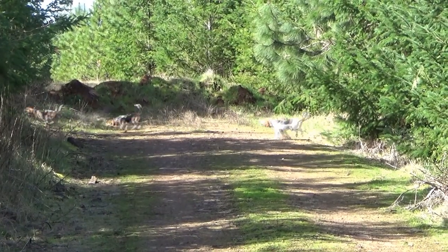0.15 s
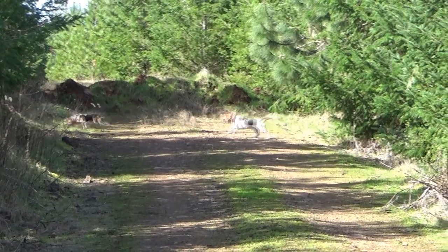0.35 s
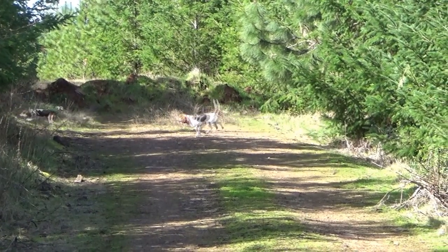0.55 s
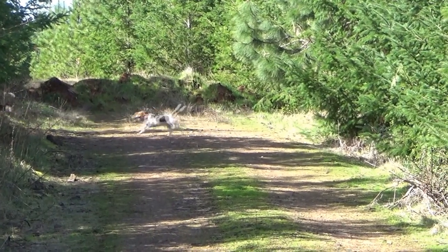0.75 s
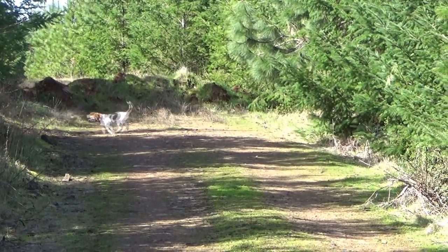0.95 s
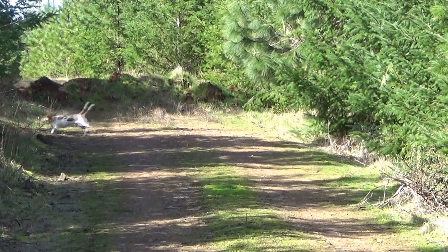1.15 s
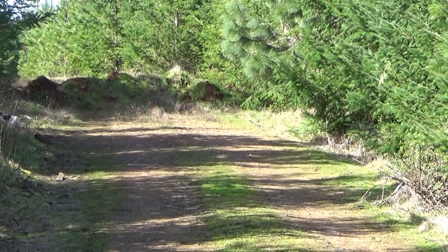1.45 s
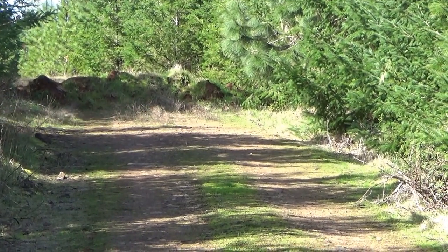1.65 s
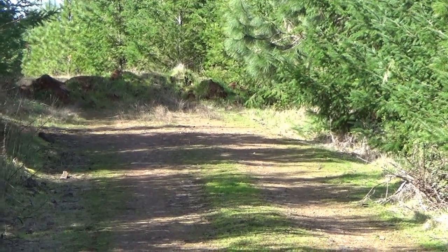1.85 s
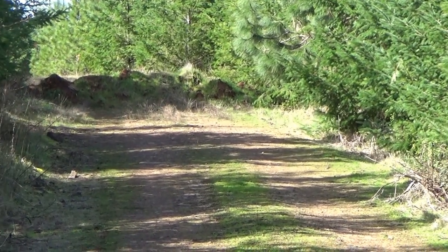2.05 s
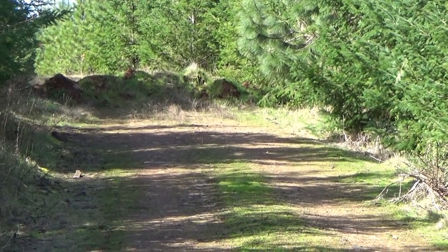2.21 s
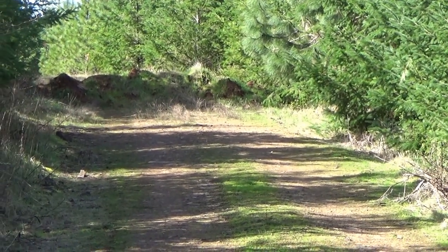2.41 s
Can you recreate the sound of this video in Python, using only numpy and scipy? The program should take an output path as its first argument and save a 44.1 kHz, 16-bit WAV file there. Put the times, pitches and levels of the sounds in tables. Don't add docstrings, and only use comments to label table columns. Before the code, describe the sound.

A pack of hounds baying and yelping on a forest trail, one loud cracked bay up close

```python
import sys
import numpy as np
from scipy import signal
from scipy.fft import rfft, irfft, next_fast_len
from scipy.io import wavfile
from scipy.ndimage import uniform_filter1d, map_coordinates

SR = 44100
rng = np.random.default_rng(int(sys.argv[2]) if len(sys.argv) > 2 else 0)


def gain_from_db(level_db):
    decades = np.asarray(level_db, float) / 20
    return 10 ** decades


def unload_audio(sound):
    columns = np.transpose(np.atleast_2d(sound))
    steps = np.round(np.clip(columns, -1, 1) * 32767)
    wavfile.write(sys.argv[1], SR, steps.astype(np.int16))


N = 114660

# f/Hz, level/dB
BARK_THROAT = [(380, -23.5), (600, 12.5), (1200, 2), (1700, -5), (2600, -9.5), (3400, -26.5), (6000, -26.5),
               (11000, -26)]
ATTACK_S, RELEASE_S = .005, .014


def near_hound():
    # t/s, pitch f/Hz, level/dB, mouth opening/dB, half-pitch share/0-1
    bay = [
        (.222, 531.2, -50, 26, 0.36),
        (0.241, 598.7, -30.5, 13.5, 0.99),
        (0.277, 542.5, -22.5, 13.5, 0.58),
        (0.302, 608.3, -12.5, -2, 0.04),
        (0.347, 636.2, -11, -17, 0.96),
        (0.364, 579.1, -15.5, -10.5, 0.65),
        (0.399, 591, -13, -16.5, 0.66),
        (.416, 499.3, -30.5, 1, 0.83),
        (0.451, 483, -46.5, 7, 0.8),
    ]
    # f/Hz, level/dB
    throat = [(300, -45), (600, 0.5), (850, -0.5), (1100, -6), (1400, -14), (2200, -24), (3200, -50),
              (4300, -75)]
    # f/Hz, level/dB per Hz
    breath_spectrum = [(3500, -25), (5000, -20), (5700, -7), (7000, 1), (8000, -8), (9300, -4),
                       (11500, -14), (12500, -40)]
    # f/Hz, level/dB per Hz
    chest_spectrum = [(40, -15.5), (110, -5), (250, -1), (420, -1), (520, -45.5)]
    # from t/s, to t/s, first f/Hz, last f/Hz, first level/dB, last level/dB
    groan_glide = (.4, .5, 520, 150, -42, -60)

    s, *columns = np.transpose(bay)
    span = np.arange(round(s[0] * SR), round(s[-1] * SR))
    curves = [uniform_filter1d(np.interp(span / SR, s, c), size=260) for c in columns]
    pitch, level_db, opening_db, half = curves
    tone, phase = folds(pitch, throat, .003 + .03 * half, .5 + 3 * half, opening_db, half)

    air = rng.standard_normal((2, len(span))) * (1 + 0.46 * np.cos(phase))
    rasp = unit(coloured(air[0], [(350, -70), (650, -18)] + throat[2:]))
    rasp = rasp * gain_from_db(-5 + opening_db) * np.sqrt(np.abs(half))
    breath = unit(coloured(patchy(air[1:], depth_db=5.5)[0], breath_spectrum))
    breath = breath * gain_from_db(-39 + 0.61 * opening_db + 0.81 * level_db)
    chest = gain_from_db(-38) * unit(coloured(rng.standard_normal(len(span)), chest_spectrum))

    t = np.arange(N) / SR
    groan_hz = np.exp(np.interp(t, groan_glide[:2], np.log(groan_glide[2:4])))
    groan = np.sin(2 * np.pi * np.cumsum(groan_hz) / SR)
    out = groan * gain_from_db(np.interp(t, groan_glide[:2], groan_glide[4:], left=-120, right=-120))
    onset = np.clip((span - span[0]) / (ATTACK_S * SR), 0, 1) ** 2
    out[span] += onset * (gain_from_db(level_db) * (1.49 * tone + rasp + chest) + breath)
    return out


def folds(pitch, throat, jitter, shimmer_db, opening_db=0, half=0):
    size = len(pitch)
    pitch = pitch * (1 + jitter * wobble(size, 69.82))
    half_phase = np.pi * np.cumsum(pitch) / SR
    tone = 0
    for k in range(1, 21):
        level_db = along(throat, k * pitch / 2) + opening_db * (k > 2)
        level_db = level_db + shimmer_db * np.sqrt(k / 2) * wobble(size, 61.7)
        share = half if k % 2 else 1
        tone = tone + gain_from_db(level_db) * share * np.sin(k * half_phase + k * k)
    return tone, 2 * half_phase


def far_hound(calls, throat, jitter, shimmer_db, hoarse, half, swell=0):
    out = np.zeros(N + SR)
    share = np.clip(hoarse, 0, 1)
    for s, length, level_db, first_hz, last_hz in calls:
        t = np.arange(round((1.6 * length + .1) * SR)) / SR
        rise = np.clip(t / (ATTACK_S + swell * length), 0, 1)
        after = np.clip(t - (1 - swell) * length, 0, 1)
        shape = rise * np.exp(-after / (RELEASE_S + swell * length / 2))
        pitch = first_hz + (last_hz - first_hz) * np.minimum(t, length + RELEASE_S) / length
        tone, phase = folds(pitch, throat, jitter, shimmer_db, 0, half)
        rasp = coloured(rng.standard_normal(len(t)) * (1 + 0.72 * np.cos(phase)), throat)
        rasp = rasp * gain_from_db(2.0 * wobble(len(t), 30))
        voice = np.sqrt(1 - share) * unit(tone) + np.sqrt(share) * unit(rasp)
        out[round(max(s, 0) * SR):][:len(t)] += gain_from_db(level_db) * shape * voice
    return out[:N]


def bays():
    calls = [(0, 0.014, -26.5, 633, 581.5), (.05, 0.026, -31.5, 695, 687), (.11, 0.12, -46, 640, 608),
             (.41, 0.023, -30.5, 671, 638.4), (.475, .03, -51, 614, 630), (.53, 0.062, -38.5, 674.6, 616),
             (.64, 0.018, -35, 617, 667), (.741, 0.013, -29.5, 670, 715.5),
             (1.069, 0.15, -32.5, 644.5, 531.4), (1.25, 0.024, -38, 688, 642),
             (1.29, 0.018, -31.5, 619, 631), (1.33, 0.047, -33, 608.6, 650.2),
             (1.455, 0.043, -44.5, 620.5, 672), (1.675, .14, -36.5, 582.7, 521.8),
             (1.935, 0.059, -29, 643.4, 646), (2.02, 0.029, -30.5, 605, 590.4),
             (2.09, 0.061, -39.5, 612, 585.4), (2.2, 0.044, -45, 638, 667), (2.405, 0.024, -26, 646, 628),
             (2.46, 0.055, -35, 665, 647), (2.53, 0.068, -32.5, 650, 564)]
    # f/Hz, level/dB
    throat = [(400, -21.5), (620, 10.5), (950, 6), (1250, -11), (1900, -13), (2600, -48), (3500, -39.5)]
    return far_hound(calls, throat, jitter=.009, shimmer_db=2, hoarse=.06, half=.2)


def barks():
    calls = [
        (.68, 0.09, -37.5, 522.7, 498),
        (1.38, 0.13, -37, 512, 501.5),
        (1.86, 0.2, -30, 504, 474),
        (2.24, 0.11, -33, 493, 467),
        (2.34, 0.15, -32, 501.4, 469),
        (2.46, .15, -30.5, 512, 473),
    ]
    return far_hound(calls, BARK_THROAT, jitter=.03, shimmer_db=3.5, hoarse=.5, half=.6, swell=.25)


def dull_barks():
    calls = [
        (0, .1, -32.5, 498.3, 484),
        (.5, 0.12, -34.5, 485.7, 453),
        (1.17, 0.198, -35, 470.4, 443.4),
        (1.68, 0.12, -36, 501.2, 477),
    ]
    throat = BARK_THROAT[:5] + [(3800, -50)]
    return far_hound(calls, throat, jitter=.03, shimmer_db=2, hoarse=.75, half=.6, swell=.25)


def yelps():
    calls = [
        (.51, 0.03, -39.5, 471.6, 473),
        (.56, 0.13, -54, 470, 438),
        (.952, 0.019, -43, 514, 494.6),
        (1.825, 0.029, -37, 468, 497.5),
        (1.89, 0.045, -39, 512, 436),
        (2.252, 0.046, -30.5, 515.8, 488.5),
        (2.31, 0.064, -39, 478.8, 487),
    ]
    # f/Hz, level/dB
    throat = [(300, -43), (460, -8), (950, 3), (1600, 1), (2500, -5.5), (3000, -8.5), (3800, -37),
              (6000, -66)]
    return far_hound(calls, throat, jitter=.022, shimmer_db=2.6, hoarse=.22, half=.1)


def whoops():
    calls = [
        (1.162, 0.019, -32, 871, 944),
        (1.186, 0.021, -28, 436.8, 423.3),
        (1.22, 0.044, -44, 1050, 896),
        (1.897, 0.036, -32, 1037, 945),
        (1.93, 0.065, -43.5, 958, 1032),
        (2.005, 0.055, -48, 1044, 1015),
        (2.07, 0.039, -58, 755, 856),
        (2.31, 0.071, -34.5, 980, 918),
    ]
    # f/Hz, level/dB
    throat = [(420, -21), (880, 7), (1300, -3.5), (1750, 4), (2150, -3.5), (2600, -20), (3100, -21),
              (4200, -77)]
    return far_hound(calls, throat, jitter=.008, shimmer_db=1.5, hoarse=.12, half=.05)


def cries():
    calls = [(.61, 0.13, -45, 914.4, 1031), (.845, 0.019, -39, 1227, 1250), (.9, 0.036, -47, 1258, 1211),
             (1.36, 0.071, -36, 944, 1254), (1.43, 0.15, -42, 1221, 1115), (1.855, 0.017, -30, 1602, 1494),
             (1.92, 0.032, -31.5, 1296, 1273), (1.985, 0.035, -29.5, 1249, 1207),
             (2.03, 0.0446, -40.5, 1176, 1102), (2.085, 0.039, -56, 1110, 1240),
             (2.268, 0.026, -36.5, 1313, 1320), (2.375, 0.05, -29, 1304, 1224),
             (2.44, 0.055, -30.5, 1210, 1196), (2.52, 0.075, -39, 1286, 1120)]
    # f/Hz, level/dB
    throat = [(700, -18.5), (1250, -3), (2500, -21.5), (3800, -41), (5000, -47)]
    return far_hound(calls, throat, jitter=.008, shimmer_db=2, hoarse=.1, half=.1)


def squeals():
    calls = [
        (0, 0.099, -43, 1290, 1380),
        (.155, 0.04, -42.5, 1114, 1244),
        (.815, 0.019, -41, 1247, 1190),
        (1.04, 0.04, -36.5, 1301, 1351),
        (1.085, 0.085, -53, 1396, 1374),
        (1.636, .038, -32.5, 1278, 1238),
        (1.868, 0.0188, -30.5, 1255, 1167),
    ]
    # f/Hz, level/dB
    throat = [(700, -2), (1250, 11), (2600, 7.5), (3900, -25), (5100, -38)]
    return far_hound(calls, throat, jitter=.004, shimmer_db=1.5, hoarse=.04, half=.02)


def shrieks():
    calls = [
        (.628, 0.0055, -51.5, 1371, 1313),
        (.69, 0.031, -36, 1480, 1285),
        (.765, 0.0398, -41, 1240, 1267),
    ]
    # f/Hz, level/dB
    throat = [(700, -13), (1350, 3), (2600, -7.5), (3800, -19), (4300, -14), (5300, -19), (7500, -38)]
    return far_hound(calls, throat, jitter=.008, shimmer_db=2.6, hoarse=.2, half=.05)


def wheezes():
    calls = [(1.8, 0.018, -69, 5280, 5000), (1.85, .05, -62, 3750, 3680), (1.895, .012, -65, 5400, 5560),
             (1.94, 0.036, -52, 4760, 4380), (1.975, 0.034, -56, 5490, 5670), (1.985, .02, -55, 4670, 4500),
             (2.01, .03, -56, 5720, 5450), (2.01, 0.033, -60, 4430, 4250), (2.35, .065, -56, 4550, 4150),
             (2.47, .05, -67, 4450, 4230), (1.415, .03, -60, 3780, 3680)]
    # f/Hz, level/dB
    throat = [(3000, -30), (3600, 0), (5800, 0), (7000, -90)]
    return far_hound(calls, throat, jitter=.025, shimmer_db=4.5, hoarse=.45, half=0)


def twigs():
    # t/s, peak level/dB
    snaps = [
        (.125, -61),
        (.138, -61),
        (.974, -63),
        (1.496, -56),
    ]
    # f/Hz, level/dB per Hz
    spectrum = [(2000, -31.5), (5000, 7), (8000, 15), (11000, 9), (14000, -40)]
    # from t/s, t/s the rise heads for, break-off t/s, level/dB
    rustle = (-1.2, 0.2, 0.05, -67)
    t = np.arange(N) / SR
    puffs = gain_from_db(rustle[3]) * np.interp(t, rustle[:3], [0, 1, 0])
    for s, db in snaps:
        puffs = puffs + gain_from_db(db - 60 * np.abs(t - s) / .04) * (t > s - .002)
    return puffs * unit(coloured(rng.standard_normal(N), spectrum))


def trees(x):
    # f/Hz, t60 t/s
    decay = [(300, 0.35), (1200, 1), (2600, 0.51), (8000, 0.49)]
    # f/Hz, level/dB
    side_tilt = [(800, 0), (2500, 4), (7000, 4)]
    hz, t, z = signal.stft(rng.standard_normal((2, SR)), SR, nperseg=256)
    tail = signal.istft(z * gain_from_db(-60 * t / along(decay, hz)[:, None]), SR, nperseg=256)[1]
    tail = tail / np.linalg.norm(tail[0])
    delayed = np.pad(x, (700, 0))[None]
    echo = signal.fftconvolve(delayed, tail, axes=1)[:, :N]
    mid, side = patchy(echo, depth_db=4)
    return np.array([mid, gain_from_db(-10) * coloured(side, side_tilt)])


def background():
    # f/Hz, level/dB per Hz
    spectrum = [(25, -18.5), (95, -1), (140, -8), (300, -14.5), (1000, -8), (4000, -22), (9000, -27),
                (15500, -33)]
    # f/Hz, level/dB
    side_tilt = [(40, -8.5), (90, -5.5), (160, 1.5), (350, 4.5), (3000, 3), (7000, -1.5), (8200, -26.5)]
    mid, side = unit(coloured(rng.standard_normal((2, N)), spectrum))
    return gain_from_db(-54) * np.array([mid, gain_from_db(-9) * coloured(side, side_tilt)])


def patchy(x, depth_db):
    z = signal.stft(x, nperseg=512)[2]
    field = uniform_filter1d(rng.standard_normal(z.shape[1:]), size=3, axis=0)
    field = uniform_filter1d(field, size=5, axis=1)
    return signal.istft(z * gain_from_db(depth_db * unit(field)), nperseg=512)[1][:, :x.shape[-1]]


def coloured(x, points):
    m = next_fast_len(x.shape[-1] + 4096)
    gain = gain_from_db(along(points, np.fft.rfftfreq(m, 1 / SR)))
    return irfft(rfft(x, m) * gain, m)[..., :x.shape[-1]]


def along(points, hz):
    f, v = np.transpose(points)
    return np.interp(np.log(hz + 1), np.log(f + 1), v)


def wobble(size, rate):
    return map_coordinates(rng.standard_normal(400), [np.arange(size) * rate / SR], mode="wrap")


def unit(x):
    return x / np.sqrt(np.mean(x ** 2) + 1e-20)


def scene():
    # f/Hz, level/dB
    air_loss = [(7500, -0.5), (11000, -11), (15000, -29)]
    # f/Hz, level/dB
    pan = [(1400, 0), (2800, .9), (5500, .8), (9000, 0)]
    near = near_hound()
    pack = bays() + barks() + dull_barks() + yelps() + whoops() + cries() + squeals() + shrieks()
    far = coloured(pack, air_loss)
    mid, side = trees(gain_from_db(-18) * near + gain_from_db(-7.5) * far) + background()
    side = side + gain_from_db(-19) * np.roll(near, 18)
    mid = mid + near + far + wheezes() + twigs()
    left = coloured(mid + side, pan)
    right = coloured(mid - side, pan * np.array([1, -1]))
    return np.array([left, right])


def top_cut(x):
    return signal.sosfilt(signal.butter(12, 15719, fs=SR, output="sos"), x)


def record(dry):
    return top_cut(dry)


dry = scene()
out = record(dry)
unload_audio(out)
```